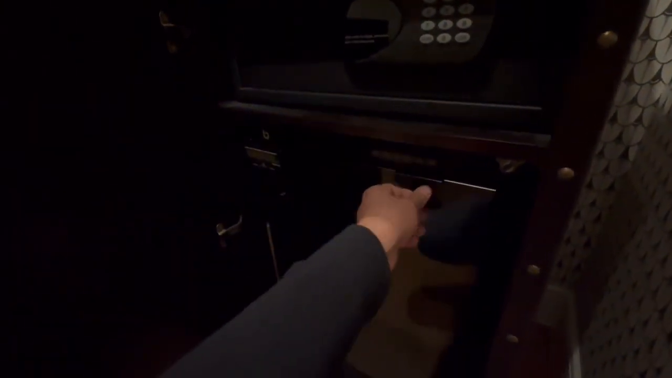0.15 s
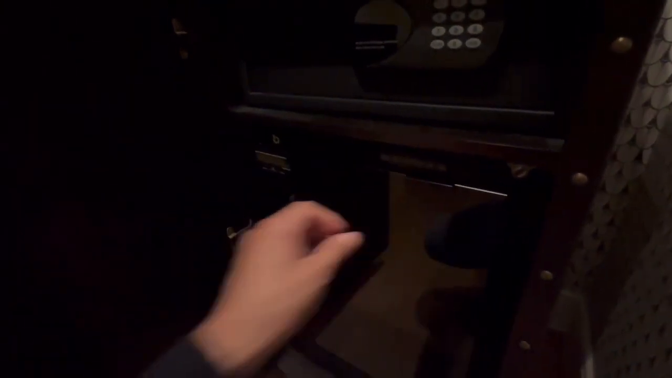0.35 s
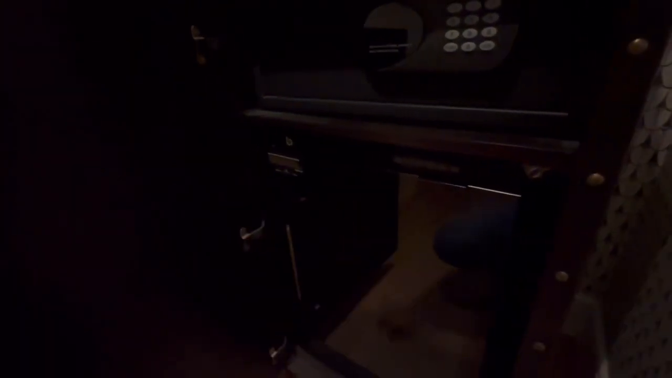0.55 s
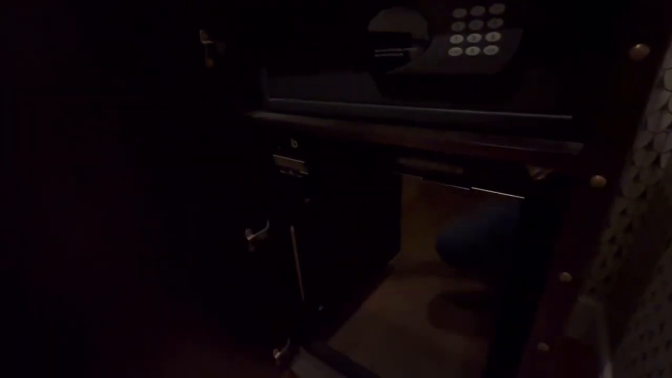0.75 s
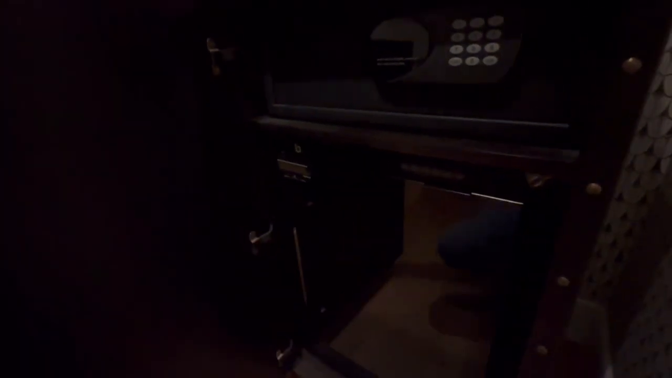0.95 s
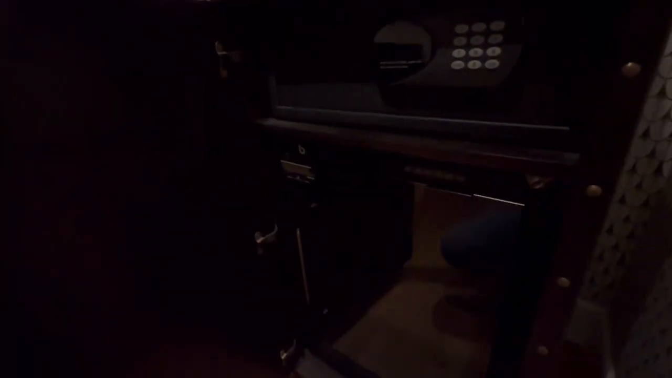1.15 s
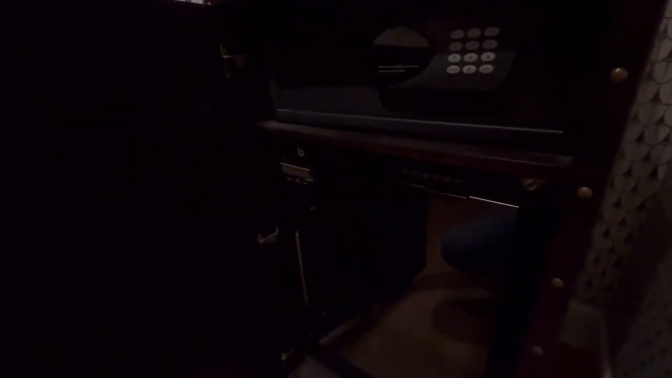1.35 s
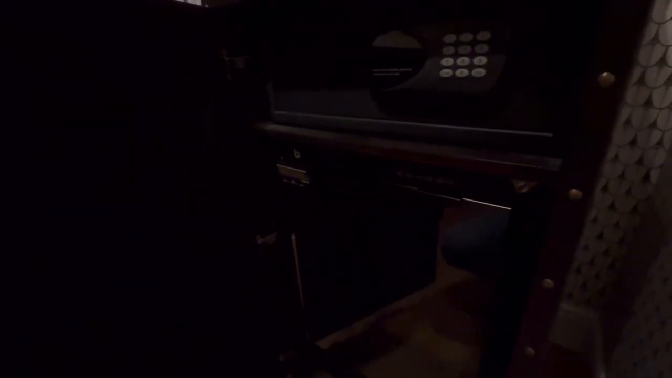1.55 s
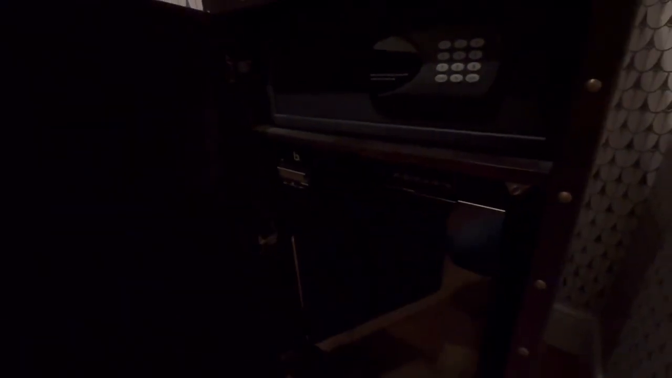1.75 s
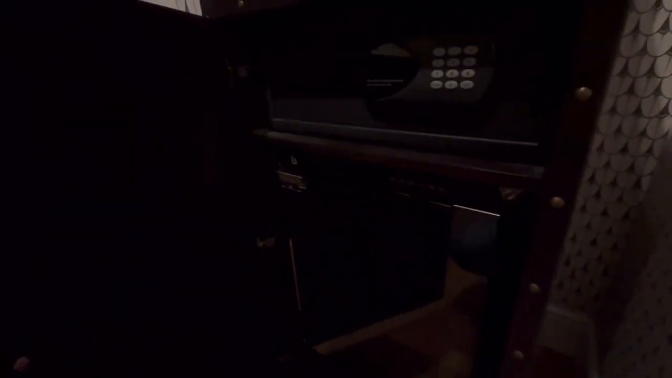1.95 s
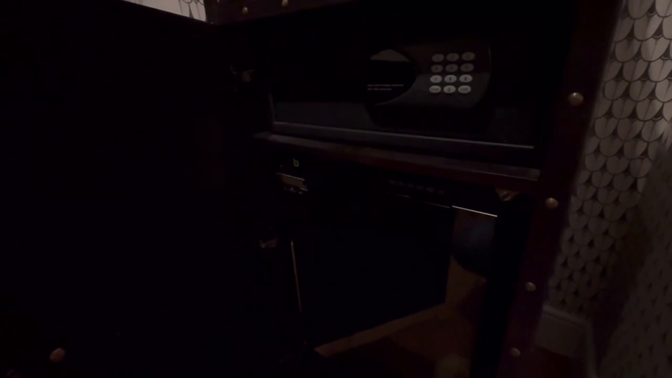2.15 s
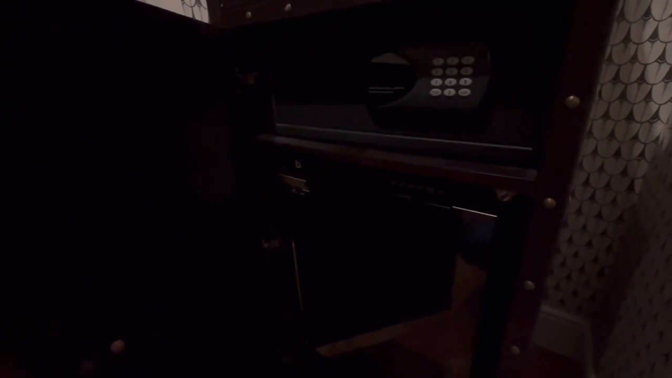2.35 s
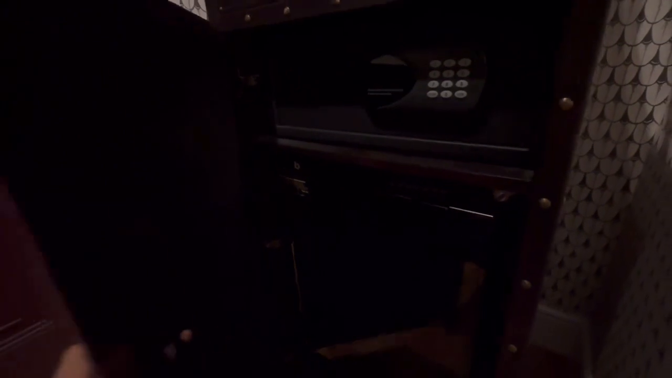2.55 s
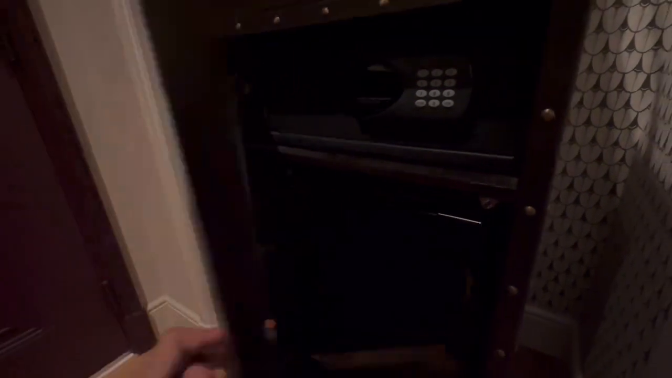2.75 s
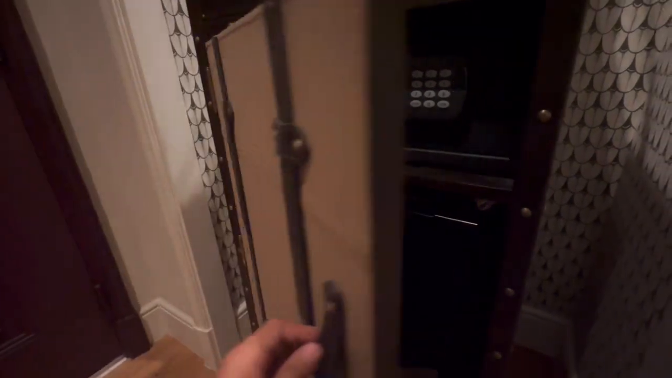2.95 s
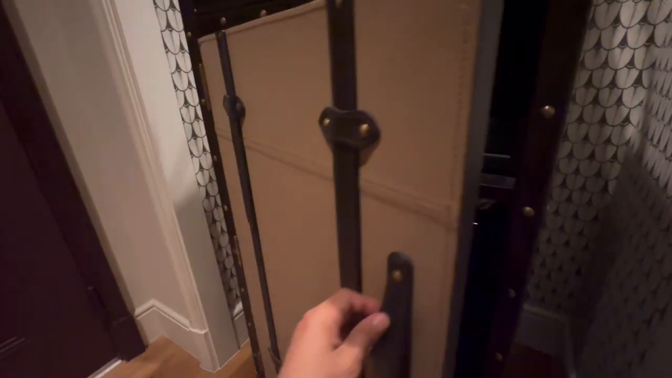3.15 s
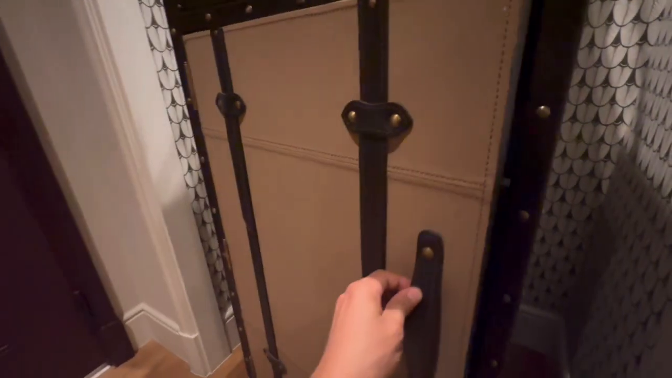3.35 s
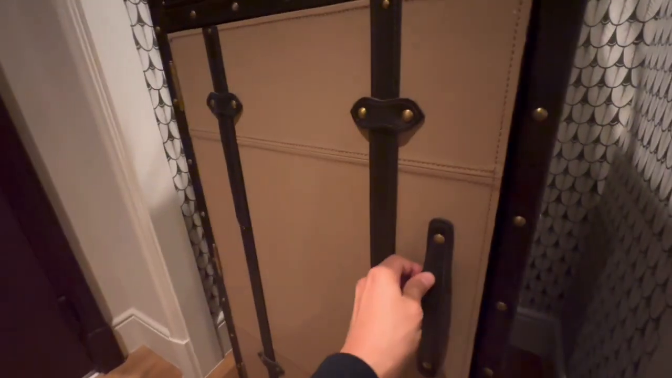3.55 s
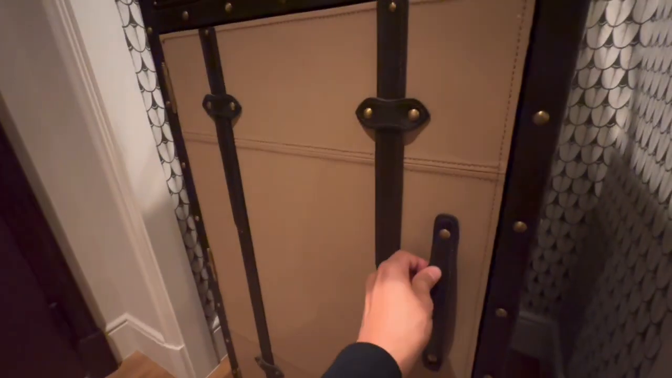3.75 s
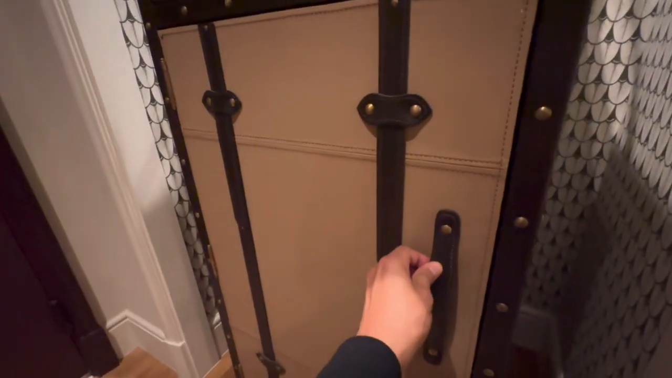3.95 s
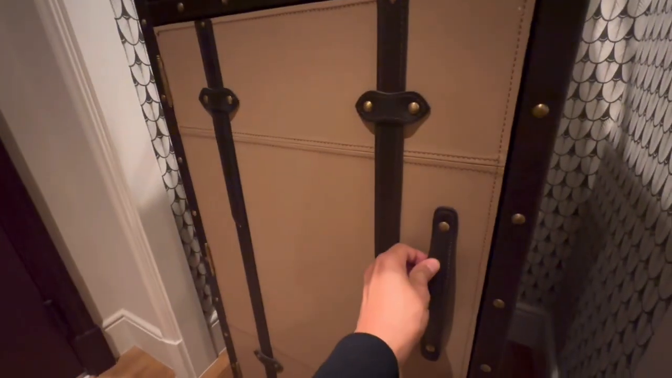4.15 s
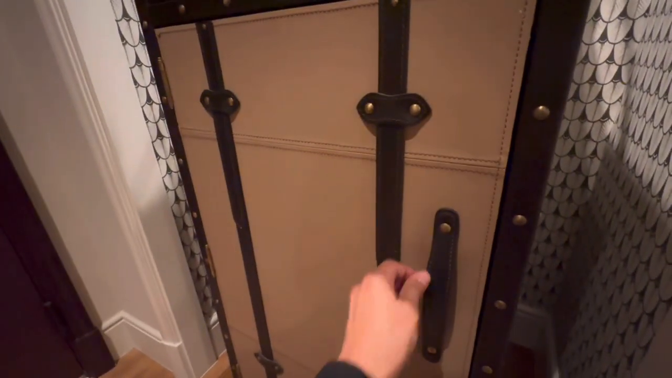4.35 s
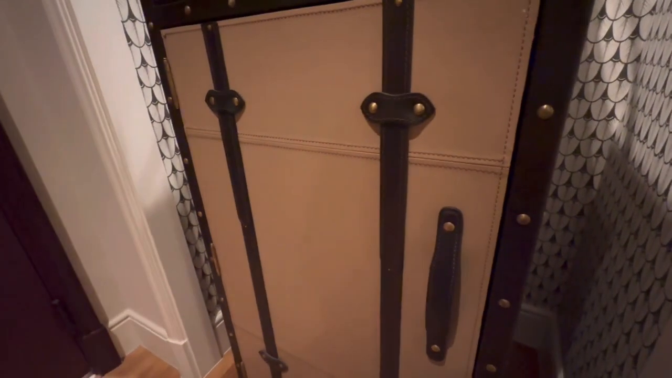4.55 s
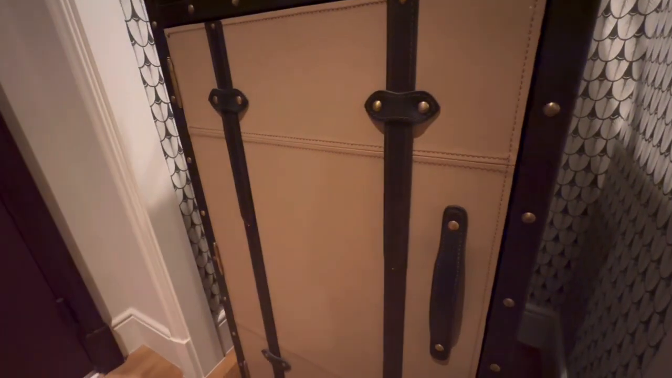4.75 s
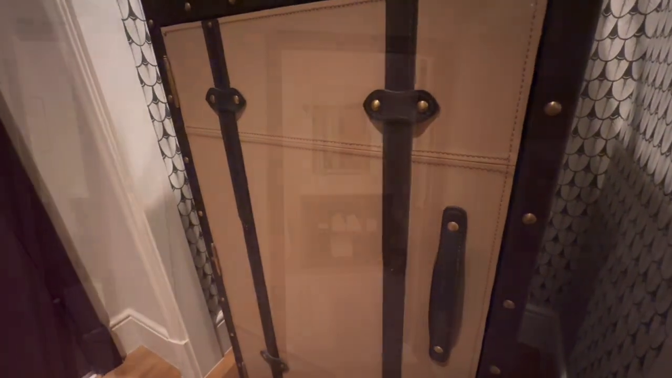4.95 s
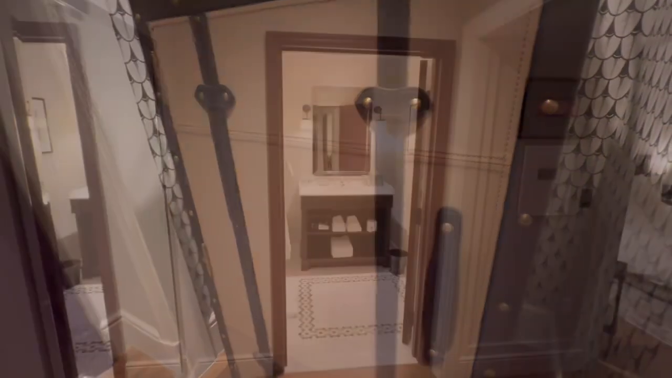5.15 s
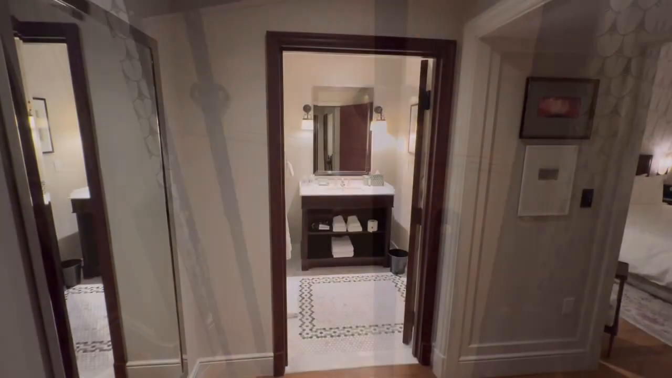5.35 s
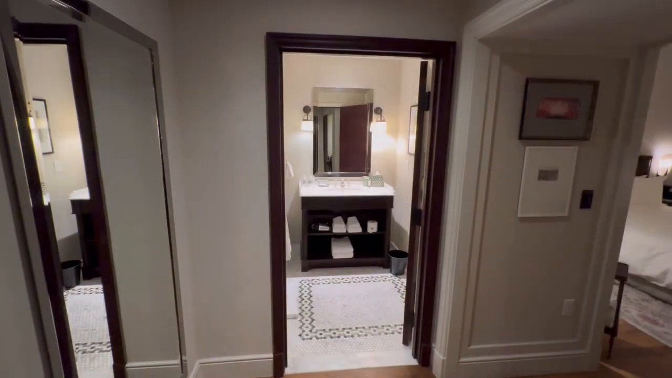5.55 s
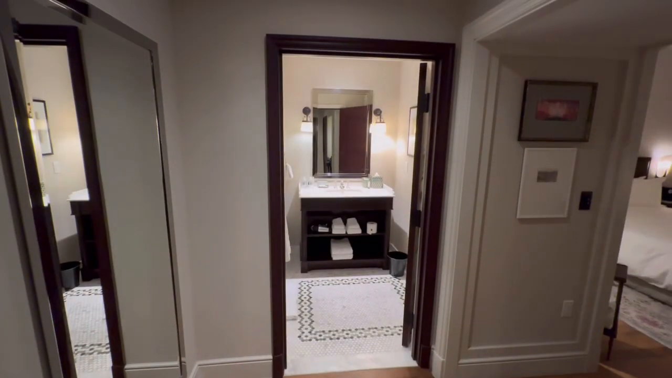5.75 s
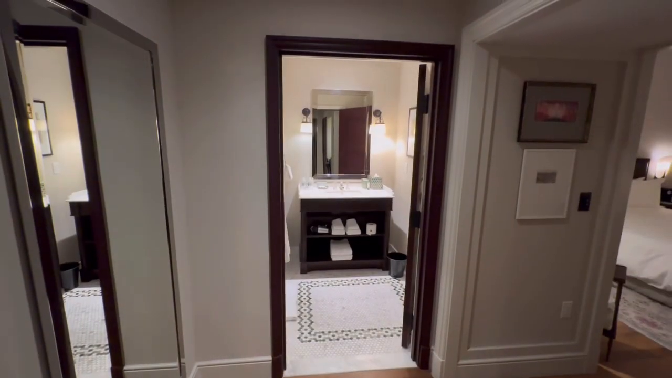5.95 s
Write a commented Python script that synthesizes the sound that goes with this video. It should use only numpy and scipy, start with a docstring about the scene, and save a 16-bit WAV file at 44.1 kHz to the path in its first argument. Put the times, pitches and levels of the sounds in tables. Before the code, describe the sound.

Three doors close in a hushed hotel room: sharp knock, padded thud, and a loud wooden clack, with sleeve rustles and light taps between.

```python
"""Three doors shut in a quiet hotel room: a cupboard knocks, a small fridge closes with a padded thud,
and the big wooden cabinet door creaks, swings round and bangs onto its frame.
Doors are shaped noise plus decaying panel tones; creaks are chirps that bend upwards.
A sleeve rustles and fingers tap between the blows, both made of filtered noise under envelopes.
Low ventilation rumble runs throughout; a faint wash joins near the end. Two microphone ports hear it."""
import sys
import numpy as np
from scipy import signal
from scipy.fft import rfft, irfft
from scipy.io import wavfile
from scipy.ndimage import uniform_filter1d

SR = 44100
rng = np.random.default_rng(int(sys.argv[2]) if len(sys.argv) > 2 else 0)


def master_out(mix):
    """Clip the mix to full scale and print it as 16-bit PCM to the path in sys.argv[1]."""
    frames = np.transpose(np.atleast_2d(mix))
    ceiling = np.clip(frames, -1, 1)
    pcm = np.round(ceiling * 32767).astype(np.int16)
    wavfile.write(sys.argv[1], SR, pcm)


N = 264158

# spectrum of soft brushing, for sleeve and swinging door: (frequency [Hz], relative level [dB per Hz])
BRUSHING = [(100, -15.5), (400, 5.5), (900, 4), (1700, -1.5), (2500, -10), (4000, -39), (8000, -46.5)]


def amp(db):
    """Amplitude factor of a level in dB."""
    return 10 ** (np.asarray(db) / 20)


def evened(x):
    """The signal scaled to an RMS of one."""
    return x / np.sqrt(np.mean(x ** 2) + 1e-20)


def read(points, hz, axis=1):
    """One column of a table, interpolated along log frequency."""
    table = np.array(points, float)
    return np.interp(np.log(hz + 1), np.log(table[:, 0] + 1), table[:, axis])


def add(mix, start_s, sound):
    """Lay a sound into the mix at its start time, cut off at the end of the mix."""
    part = mix[:, max(round(start_s * SR), 0):][:, :sound.shape[1]]
    part += sound[:, :part.shape[1]]


def noise(gain, size):
    """Noise of spectrum gain(Hz) at both ports: alike in the bass and at the top, unlike between."""
    # likeness of the two microphone ports: (frequency [Hz], left-right correlation [0 to 1])
    likeness = [(60, 0.83), (140, 1), (290, 0.4), (600, 0.047), (1400, 0.12), (8000, 0.1), (10000, 0.46),
                (11500, 0.91)]
    hz = np.fft.rfftfreq(size, 1 / SR)
    left, other = rfft(rng.standard_normal((2, size)))
    same = np.clip(read(likeness, hz), -1, 1)
    right = same * left + np.sqrt(1 - same ** 2) * other
    return irfft(np.array([left, right]) * gain(hz), size)


def octave_noise(colour, axis):
    """One second of noise with the table's levels per octave, fading below about 20 Hz."""
    def gain(hz):
        per_octave = np.sqrt(SR / 2 / np.log(2) * hz / (hz ** 2 + 20 ** 2))
        return amp(read(colour, hz, axis)) * per_octave
    return noise(gain, SR)


def dying(t, t60):
    """Exponential decay that falls 60 dB in t60 seconds."""
    return np.exp(-np.log(1000) * t / t60)


def ring_out(x, early, early_t60, liveness=1):
    """A quick carcass decay on top of the room's; the bass takes longer to build up."""
    # decay of the room before the liveness factor: (frequency [Hz], t60 [s])
    room_decay = [(60, 0.96), (250, 0.71), (1000, 0.7), (2500, 0.6), (5000, 0.52), (9000, 0.39),
                  (15000, 0.27)]
    hz, t, bands = signal.stft(x, SR, nperseg=512)
    room_t60 = liveness * read(room_decay, hz)[:, None]
    x = signal.istft(bands * dying(t, room_t60), SR, nperseg=512)[1][:, :SR]
    t = np.arange(SR) / SR
    bass = signal.sosfiltfilt(signal.butter(2, 600, fs=SR, output="sos"), x)
    bass_rise_s, treble_rise_s = 0.008, 0.0031
    built = bass * (1 - np.exp(-t / bass_rise_s)) + (x - bass) * (1 - np.exp(-t / treble_rise_s))
    return built * (1 + early * dying(t, early_t60)) / (1 + early / 2)


def ventilation():
    """Duct rumble of shaped noise that swells slowly, with a few wavering narrow-band tones."""
    # spectrum of the rumble: (frequency [Hz], relative level [dB per Hz])
    air_shape = [(15, -35.5), (28, -17), (55, 0.5), (95, -9), (170, -11), (240, -12), (400, -15.5),
                 (560, -27), (1400, -35), (2350, -36.5), (2800, -49), (5600, -49), (12000, -52.5),
                 (16000, -61)]
    # wavering narrow-band tones of fan and compressor: (frequency [Hz], level before the swell [dB])
    hum_tones = [(53.8, -58.5), (224, -70.5), (2290, -90.5)]
    air_db, swell_db = -56, 1
    out = amp(air_db) * evened(noise(lambda hz: amp(read(air_shape, hz)), N))
    for tone_hz, db in hum_tones:
        tone = noise(lambda hz: 1 / (1 + ((hz - tone_hz) / 4) ** 2), N)
        out += amp(db) * evened(tone)
    swell = evened(noise(lambda hz: np.exp(-(hz / 3) ** 2), N)[0])  # wavers at a few Hz
    return out * amp(swell_db * swell)


def door(colour, modes, crack_t60, give_s, second_s, second, modes_db, flex_s, swell_s,
         early, early_t60, pan_db, liveness):
    """The edge meets the frame at two points and gives a little, then the panel flexes and the room rings."""
    t = np.arange(SR) / SR
    out = ring_out(octave_noise(colour, axis=2), early, early_t60, liveness)
    second_contact = second * (t > second_s) * dying(abs(t - second_s), crack_t60)
    contact = dying(t, crack_t60) + second_contact
    out += octave_noise(colour, axis=1) * contact
    out *= 1 - np.exp(-t / give_s)
    panel = np.zeros((2, SR))
    for hz, db, t60 in modes:
        # short waves reach the two ports out of step
        skew = rng.uniform(-np.pi, np.pi, (2, 1)) * min(hz / 900, 1) ** 2
        panel += amp(db) * dying(t, t60) * np.sin(2 * np.pi * hz * t + skew)
    sides = amp(modes_db + np.array([[.5], [-.5]]) * pan_db)
    add(out, flex_s, sides * panel * (1 - np.exp(-(t / swell_s) ** 2)))
    return out


def catch(ring_hz, db, t60, pan_db):
    """A small metal part rings for some milliseconds as one decaying sine."""
    t = np.arange(SR // 10) / SR
    sides = amp(db + np.array([[.5], [-.5]]) * pan_db)
    return sides * dying(t, t60) * np.sin(2 * np.pi * ring_hz * t)


def doors():
    """Cupboard, fridge on its rubber seal, and the heavy cabinet front with its metal catch."""
    # each door's colour before its envelopes: (frequency [Hz], first contact [dB per octave],
    # ringing of carcass and room [dB per octave])
    cupboard = [(30, -92, -37), (70, -57, -28), (140, -29, -34.5), (300, -16, -28), (547, -45, -28),
                (1200, -36, -36), (2640, -28.5, -48.5), (4330, -26.5, -37.5), (9340, -20, -41),
                (11500, -32, -49), (15500, -47, -53)]
    fridge = [(30, -77, -47), (70.6, -50, -32.5), (141, -50, -28), (296, -59, -38.5), (620, -60, -40),
              (1100, -19.5, -35.5), (2650, -33.5, -48), (4400, -30, -45.5), (5800, -70, -51),
              (10600, -65, -47.5), (15500, -61, -57)]
    cabinet = [(30, -62, -44), (70.05, -45, -25), (144, -38.5, -23.5), (300, -40.5, -26.5), (600, -39, -25),
               (1195, -26, -24), (2850, -16, -24.5), (4300, -23.5, -24.5), (9847, -6.5, -21),
               (11800, -17, -30.5), (15500, -29, -47.5)]
    # panel modes of each door: (frequency [Hz], relative level [dB], t60 [s])
    cupboard_modes = [(68.6, 1, 0.47), (213.3, -16.5, 0.59), (271, -10.5, 0.28), (356.4, -13, 0.41),
                      (439.4, -13.5, 0.49), (572, -19, 0.35), (720, -32, .22), (945, -16, 0.34),
                      (2610, -25.5, 0.19)]
    fridge_modes = [(76, 16.5, 0.11), (87.8, -9, 0.71), (139, -12, 0.52), (201.7, -11, 0.6),
                    (284, -25.5, 0.73), (388.4, -21, 0.58), (510, -21.5, 0.51), (687, -20, 0.44),
                    (1122, -9.5, 0.28), (1107, -11.5, 0.24), (2050, -10, 0.13)]
    cabinet_modes = [(65, -1, .45), (95, -6, .3), (141, -2, .42), (171, -13, .65), (213, -9, .6),
                     (348, -16, .55), (480, -12, .38), (668, -17, .45), (1120, -15, .37), (1393, -17, .36),
                     (1805, -19, .4), (1886, -17, .45), (2295, -19, .35), (2773, -15, .25),
                     (2945, -19, .35), (3324, -20, .32), (5905, -22, .3), (7128, -22, .28)]
    # strikes of the metal catch as the cabinet door lands:
    # (time [s], frequency [Hz], level [dB], t60 [s], left-right difference [dB])
    catch_strikes = [(3.7546, 9300, -5, .004, -2), (3.756, 3025, -12.5, .016, -4)]
    out = np.zeros((2, N))
    add(out, .009, door(
        cupboard, cupboard_modes, crack_t60=0.015, give_s=0.00096, second_s=0.006, second=0.26,
        modes_db=-19.0, flex_s=0.00057, swell_s=0.015,
        early=1.0, early_t60=0.17, pan_db=0, liveness=.84))
    add(out, 1.6475, door(
        fridge, fridge_modes, crack_t60=0.026, give_s=0.0015, second_s=0.0028, second=0.45,
        modes_db=-21.5, flex_s=0.00255, swell_s=0.018,
        early=0.99, early_t60=0.71, pan_db=-1.0, liveness=0.98))
    add(out, 3.7545, door(
        cabinet, cabinet_modes, crack_t60=0.0046, give_s=.0001, second_s=0.0047, second=0.38,
        modes_db=-16.0, flex_s=.0135, swell_s=.003,
        early=1.0, early_t60=0.16, pan_db=1.5, liveness=0.87))
    for start_s, ring_hz, db, t60, pan_db in catch_strikes:
        add(out, start_s, catch(ring_hz, db, t60, pan_db))
    return out


def sleeve():
    """Cloth slides over cloth: grainy hiss above soft brushing; each stroke swells, flutters and dies away."""
    # strokes of the sleeve: (start [s], length [s], relative hiss level [dB],
    # relative brushing level [dB], tilt of the hiss [dB per octave])
    strokes = [(0.258, 0.17, -64, -59, -7), (.43, .2, -67, -60.5, -8.5), (0.914, 0.071, -65, -60, 1),
               (1.021, 0.13, -61, -64.5, 2.5), (1.12, 0.25, -63.5, -60.5, -1),
               (1.359, 0.041, -59.5, -66, -3), (1.56, 0.14, -62, -56.5, -8.5),
               (1.77, 0.14, -58.5, -57.5, 0), (1.87, 0.14, -61.5, -59.5, 2.5),
               (2.027, 0.14, -56.5, -59.5, 3.5), (2.172, .15, -59, -60, 0.5), (2.42, 0.073, -55.5, -56, 6),
               (2.69, 0.027, -54.5, -64.5, 6), (2.79, 0.16, -72, -74, 3), (4.939, 0.12, -66, -65.5, -2),
               (5.139, 0.096, -69, -62, -9.5)]
    # spectrum of the hiss before its tilt: (frequency [Hz], relative level [dB per Hz])
    hiss_shape = [(1200, -7.5), (2500, -1), (4000, 3), (6000, 0), (9000, 3.5), (12000, -4), (15500, -6)]
    # the cloth gathers speed over this share of a stroke, then slides to rest
    attack_share, rest_t60_s = 0.54, 0.39
    grain_db, flutter_db = 1.17, 0.4
    out, t = np.zeros((2, N)), np.arange(SR) / SR
    for start_s, length, hiss_db, brush_db, tilt_db in strokes:
        gathering = np.minimum(t / (attack_share * length), 1)
        speed = gathering * dying(np.maximum(t - length, 0), rest_t60_s)

        def hiss_gain(hz):
            octaves_up = np.log2(np.maximum(hz / hiss_shape[1][0], 1))
            return amp(read(hiss_shape, hz) + tilt_db * octaves_up)
        hiss = evened(noise(hiss_gain, SR))
        brush = evened(noise(lambda hz: amp(read(BRUSHING, hz)), SR))
        add(out, start_s, speed * (amp(hiss_db) * hiss + amp(brush_db) * brush))
    grain = grain_db * evened(uniform_filter1d(rng.standard_normal(N), 120))
    flutter = flutter_db * evened(noise(lambda hz: np.exp(-(hz / 25) ** 2), N)[0])
    return evened(amp(grain + flutter)) * out


def taps():
    """Light touches of band noise, some dull and short, some ringing on; each builds up over about a cycle."""
    # fingers and knuckles on wood and fittings:
    # (time [s], relative level [dB], centre [Hz], width [octaves], t60 [s])
    touches = [(.951, -55.5, 1150, 1, 0.14), (1.096, -54, 800, 1.2, 0.16), (1.384, -59, 656, 1.1, 0.72),
               (1.401, -54, 8950, 1.1, 0.041), (2.124, -43, 720, 0.67, 0.042),
               (2.192, -43, 248, 0.67, 0.038), (2.815, -33.5, 170, 0.4, 0.04),
               (3.595, -63, 2000, 1.6, 0.012), (4.272, -68.5, 5995, 5, 0.1),
               (4.284, -61.5, 1005, 0.57, 0.21), (4.297, -51.5, 163.4, 0.1, .25),
               (4.301, -56.5, 360, 0.056, 0.42), (4.739, -56.5, 281.7, 0.85, 0.22),
               (5.532, -53.5, 2100, 0.31, 0.017)]
    out, t = np.zeros((2, N)), np.arange(SR // 2) / SR
    for start_s, db, centre_hz, octaves, t60 in touches:
        def band(hz):
            distance = np.log2((hz + 1) / centre_hz) / octaves
            return np.exp(-.5 * distance ** 2) / np.sqrt(hz + 1)
        touch = evened(noise(band, len(t)))
        build_up = 2 * (1 - np.exp(-t * centre_hz))
        add(out, start_s, amp(db) * touch * dying(t, t60) * build_up)
    return out


def hinge():
    """The hinge sticks and slips: each slip is a short, unsteady chirp that bends upwards."""
    # slips on the low or the high resonance: (time [s], length [s], level [dB], middle pitch [Hz])
    slips = [(2.133, 0.012, -51.5, 577), (2.13, 0.022, -63, 1537), (2.19, 0.0075, -55, 1310),
             (2.212, 0.014, -57.5, 1480), (2.243, 0.0085, -53.5, 1530), (2.271, 0.0077, -51, 537),
             (2.296, 0.037, -65, 1534), (2.312, 0.0076, -52, 585), (2.324, 0.0061, -49, 584),
             (2.371, 0.018, -57, 1494), (2.388, 0.031, -60, 1673), (2.392, 0.037, -57, 625),
             (2.437, 0.0077, -55.5, 555)]
    rise_hz = 190  # upward bend of every slip as the hinge lets go
    rough = 0.16  # pitch waver, as a share of the pitch
    out = np.zeros((2, N))
    for start_s, length, db, pitch_hz in slips:
        size = int(length * SR)
        waver = evened(uniform_filter1d(rng.standard_normal(SR // 4), 30))[:size]
        bent_hz = pitch_hz + rise_hz * np.linspace(-.5, .5, size)
        turns = np.cumsum(bent_hz * (1 + rough * waver)) / SR
        chirp = evened(np.sin(2 * np.pi * turns) * signal.windows.tukey(size, .7))
        add(out, start_s, amp(db) * chirp * amp([[1.2], [-1.2]]))  # leans left
    return out


def swing():
    """A soft brushing swells and fades with the speed of the cabinet door."""
    # the door's swing: (time of greatest speed [s], spread [s], level at that time [dB])
    door_swing = (2.95, 0.25, -62)
    fastest_s, spread_s, db = door_swing
    speed = np.exp(-.5 * ((np.arange(N) / SR - fastest_s) / spread_s) ** 2)
    return amp(db) * speed * evened(noise(lambda hz: amp(read(BRUSHING, hz)), N))


def late_wash(start_s=4.73, db=-58, tone_hz=1448, tone_db=-80):
    """The background steps up a little: shaped noise with a thin narrow-band tone in it."""
    # spectrum of the wash: (frequency [Hz], relative level [dB per Hz])
    wash_shape = [(30, 3), (60, 27), (110, 17.5), (300, 8.5), (700, -1), (1400, -8), (2350, -14),
                  (2800, -33), (8000, -50), (15000, -50)]
    wash = amp(db) * evened(noise(lambda hz: amp(read(wash_shape, hz)), N))
    tone = amp(tone_db) * evened(noise(lambda hz: 1 / (1 + ((hz - tone_hz) / 5) ** 2), N))
    fade_in = np.clip((np.arange(N) / SR - start_s) / 0.019, 0, 1)
    return (wash + tone) * fade_in


def echoes(x):
    """The room's answer to small sounds: convolution with a decaying noise tail."""
    tail = ring_out(noise(np.ones_like, SR), early=.9, early_t60=.12)
    return signal.fftconvolve(x, tail / np.linalg.norm(tail[0]), axes=1)[:, :N]


def scene():
    """Doors and small sounds in the room, with echoes of the small ones, over the background."""
    small = taps() + hinge() + sleeve() + swing()
    return doors() + small + amp(-8.5) * echoes(small) + ventilation() + late_wash()


def record(dry):
    """Each microphone port colours the sound in its own way; then a low-pass limits the band."""
    # the two microphone ports: (frequency [Hz], gain [dB], left-right difference [dB])
    port_colour = [(60, 1, 0.1), (300.3, -1, 3), (950, -0.5, 1), (2330, 2.5, 0.5), (4200, 0, 6),
                   (5260, -2, 8.5), (6855, 0, 6), (7500, -5.5, -2.5), (8000, 0.5, 2.5), (9300, -5, -3),
                   (10540, -1.5, -4), (11300, -2, 0.5)]
    edge_hz = 15800
    hz = np.fft.rfftfreq(2 * N, 1 / SR)
    sides_db = np.array([[.5], [-.5]]) * read(port_colour, hz, axis=2)
    colour_db = read(port_colour, hz) + sides_db
    heard = irfft(rfft(dry, 2 * N) * amp(colour_db))[:, :N]
    low_pass = signal.firwin(511, edge_hz, window=("kaiser", 9), fs=SR)
    return signal.oaconvolve(heard, low_pass[None], "same", axes=1)


dry = scene()
out = record(dry)
master_out(out)
```